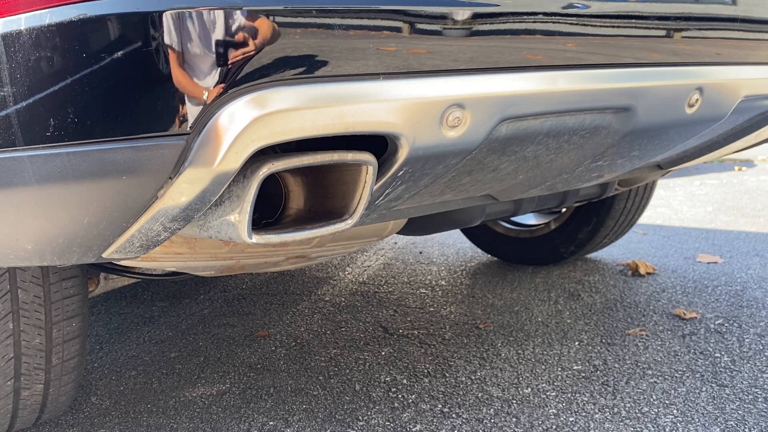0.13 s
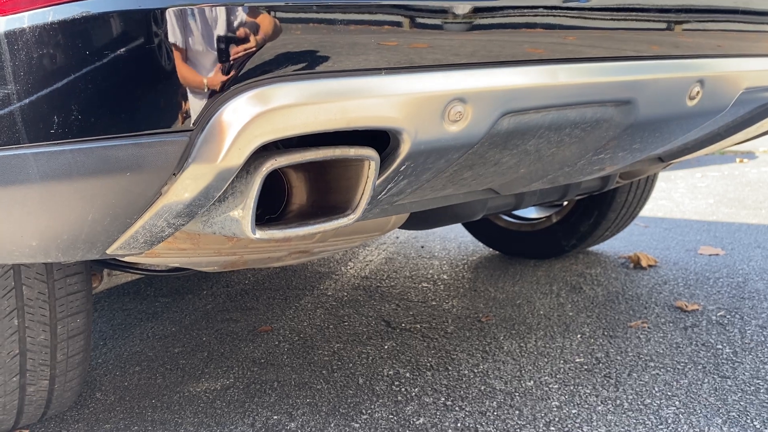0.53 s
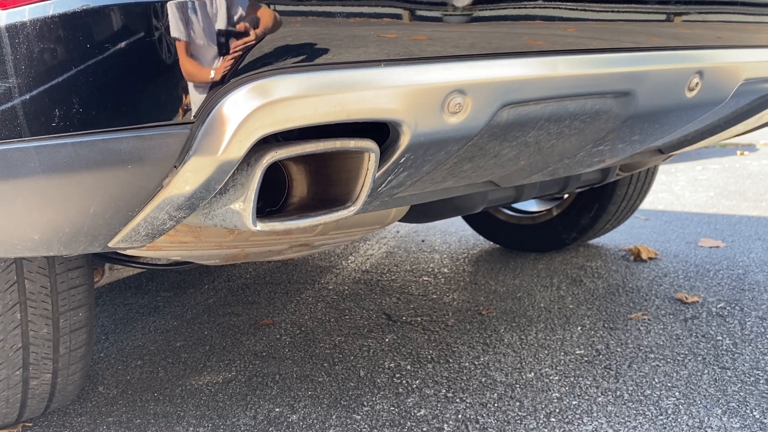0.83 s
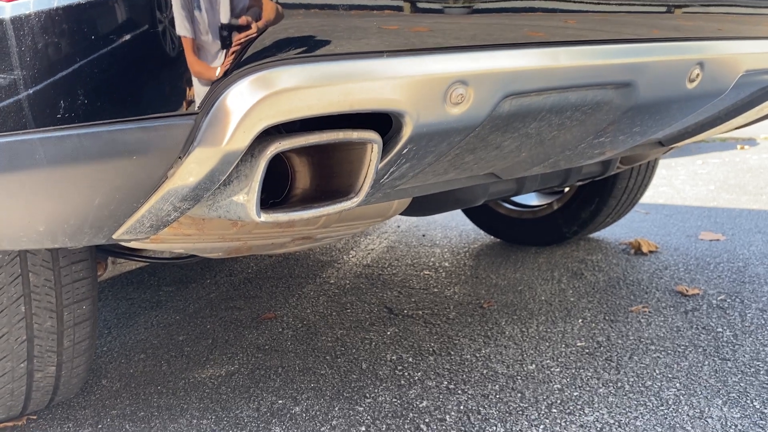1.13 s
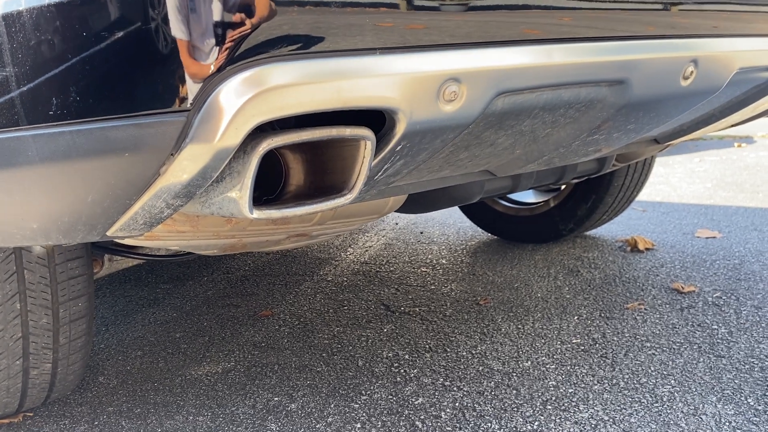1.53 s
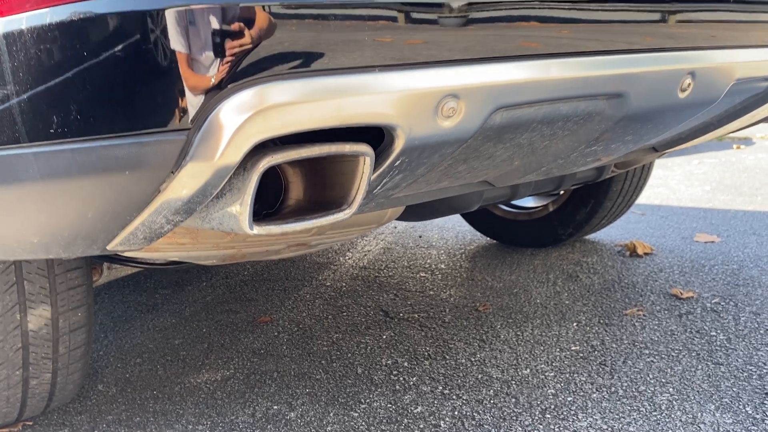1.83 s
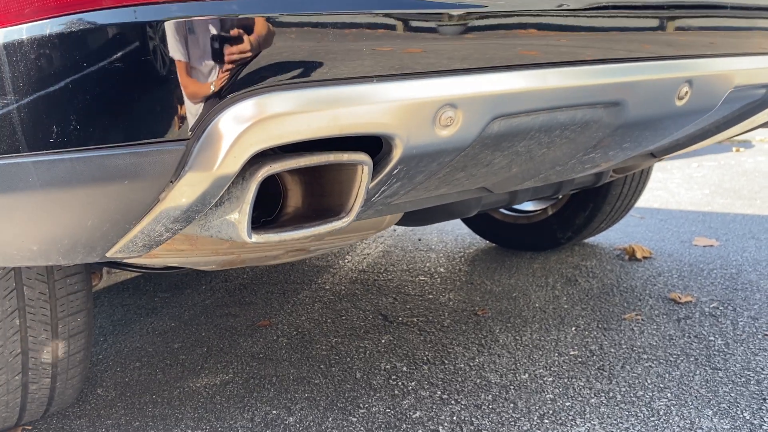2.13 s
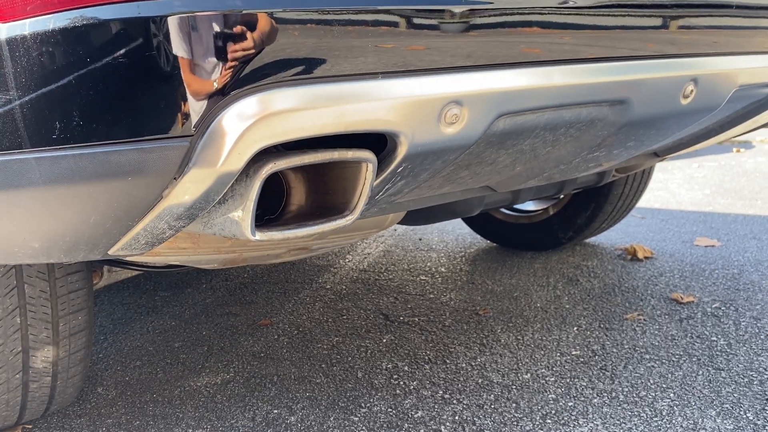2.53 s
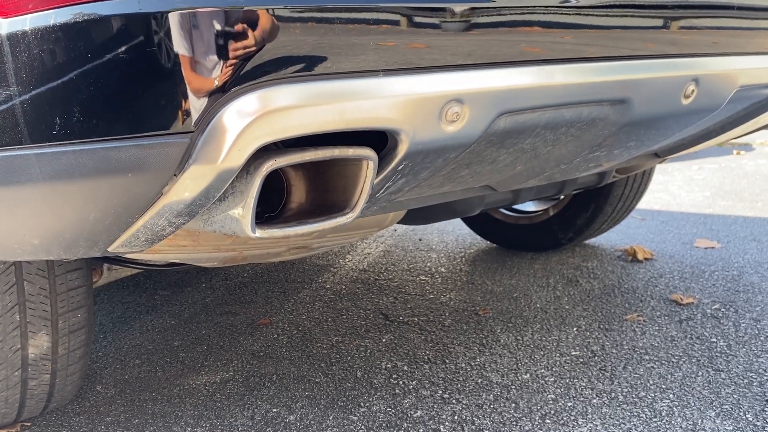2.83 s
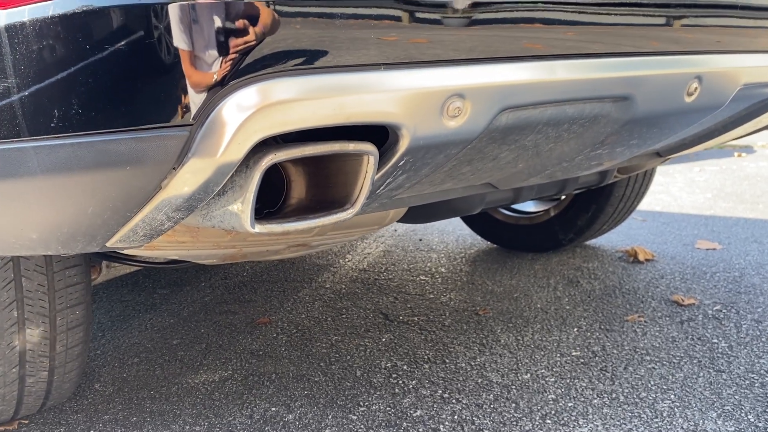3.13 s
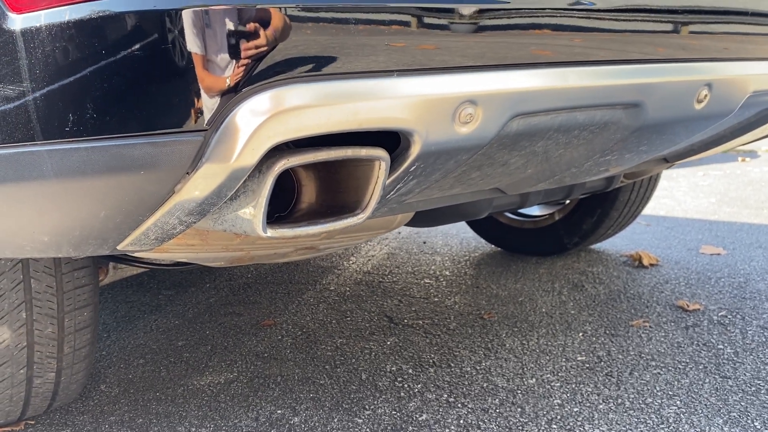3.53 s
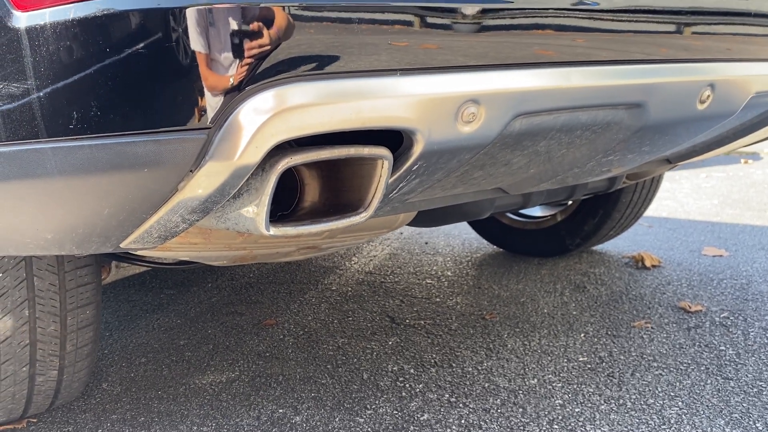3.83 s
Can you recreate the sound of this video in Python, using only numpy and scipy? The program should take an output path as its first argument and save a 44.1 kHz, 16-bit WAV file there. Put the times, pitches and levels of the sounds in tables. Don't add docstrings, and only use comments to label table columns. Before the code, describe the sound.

A parked car's exhaust idles steadily, deep and throbbing, with faint traffic far behind it.

```python
import sys
import numpy as np
from scipy import signal
from scipy.fft import rfft, irfft, next_fast_len
from scipy.io import wavfile
from scipy.ndimage import uniform_filter1d

SR = 44100
rng = np.random.default_rng(int(sys.argv[2]) if len(sys.argv) > 2 else 0)


def gain_from_db(level_db):
    decades = np.asarray(level_db, float) / 20
    return 10 ** decades


def dump(signal):
    limited = np.clip(np.atleast_2d(signal).T, -1, 1)
    pcm = np.round(limited * 32767).astype(np.int16)
    wavfile.write(sys.argv[1], SR, pcm)


N = 175518
TIME_S = np.arange(N) / SR

# (time [s], firing rate [Hz], level [dB])
IDLE = [(0.0, 56.1, -18), (0.17, 55.07, -16), (0.45, 54.44, -17.5), (0.73, 55.72, -16.5),
        (1.01, 54.38, -17), (1.29, 54.67, -16), (1.57, 55.28, -17), (1.85, 55.63, -15.5), (2.13, 55.6, -16),
        (2.41, 55.76, -16.5), (2.69, 54.9, -16.5), (2.97, 54.6, -17), (3.25, 54.14, -16),
        (3.53, 53.58, -17.5), (3.81, 53.4, -17.5), (3.98, 53.64, -17.5)]
# (frequency [Hz], level [dB])
HISS_SPECTRUM = [(600, -5.5), (1200, -9.5), (2300, -14), (3500, -19), (4700, -20), (7500, -23),
                 (11000, -23.5), (15500, -44)]
# (frequency [Hz], coherence [0-1])
PORT_COHERENCE = [(60, 1), (300, .9), (800, .45), (1600, .4), (2300, .65), (4300, .8), (5400, .3),
                  (7000, .985)]
# (frequency [Hz], phase lag [rad])
PORT_LAG = [(0, 0), (700, 1.1), (1400, 3.2), (2900, 7.6), (3700, 6), (7050, 6.3), (8950, 3.14),
            (15500, -6.4)]
# (frequency [Hz], level [dB])
PORT_BALANCE = [(380, -1), (700, 6), (1150, -.5), (2200, 0), (3000, 4.5), (4400, 1), (5700, 6.5), (7000, 0)]


def evened(x):
    return x / np.sqrt(np.mean(abs(x) ** 2) + 1e-20)


def read(points, hz):
    f, value = np.transpose(points)
    return np.interp(np.log(hz + 1), np.log(f + 1), value)


def curve(table, column, t):
    return np.interp(t, [row[0] for row in table], [row[column] for row in table])


def wander(hz):
    size = next_fast_len(N, True)
    spectrum = rfft(rng.standard_normal(N), size)
    spectrum = spectrum / (1 + (np.fft.rfftfreq(size, 1 / SR) / hz) ** 4)
    return evened(irfft(spectrum, size)[:N])


def sides(z, pan_db, lag_rad):
    left = z * gain_from_db(pan_db / 2)
    right = z * gain_from_db(-pan_db / 2) * np.exp(-1j * lag_rad)
    return np.array([left.real, right.real])


def port_lag_rad(hz):
    return np.interp(hz, *np.transpose(PORT_LAG))


def port_coherence(hz):
    return np.clip(read(PORT_COHERENCE, hz), 0, 1)


def pulse(t, rise_s):
    return (t / rise_s) ** 2 * np.exp(2 - 2 * t / rise_s)


def noise(shape_db, patchy_db, flicker_db):
    frames, hz = N // 128 + 5, np.fft.rfftfreq(512, 1 / SR)
    a, b, c, d, p = rng.standard_normal((frames, 257, 5)).T
    patches = uniform_filter1d(uniform_filter1d(p, size=6, axis=0), size=16, axis=1)
    flicker = uniform_filter1d(uniform_filter1d(p[::-1], size=120, axis=0), size=2, axis=1)
    same = port_coherence(hz)[:, None]
    lag = np.exp(-1j * port_lag_rad(hz))[:, None]
    pan = gain_from_db(read(PORT_BALANCE, hz) / 2)[:, None]
    left, other = a + 1j * b, c + 1j * d
    right = same * left * lag + np.sqrt(1 - same ** 2) * other
    level_db = shape_db(hz[:, None], np.arange(frames) * 128 / SR)
    level_db = level_db + patchy_db * evened(patches) / (1 + hz[:, None] / 6000)
    level_db = level_db + flicker_db * evened(flicker)
    z = np.array([left * pan, right / pan]) * gain_from_db(level_db)
    return signal.istft(z, nperseg=512, noverlap=384)[1][:, :N]


def fuzzy_tone(hz, width_hz):
    r = np.exp(-1.5 * np.pi * width_hz / SR)
    drive = rng.standard_normal(N) + 1j * rng.standard_normal(N)
    z = signal.lfilter([1], [1, -2 * r, r * r], drive)
    return np.sqrt(2) * evened(z) * np.exp(2j * np.pi * hz * TIME_S)


def traffic():
    # (frequency [Hz], level [dB])
    tyre_spectrum = [(150, -36), (300, -3), (500, -9.5), (850, 0.5), (1500, -3), (2100, -11.5), (3000, -24),
                     (5000, -41.5)]
    # (time [s], level [dB], brightness [dB/octave])
    passing = [(0, -48.5, 7), (.55, -40.5, -3), (.9, -44.5, 0.5), (1.3, -39.5, 2.5), (1.48, -37.5, 0.5),
               (1.62, -35.5, 2.5), (1.76, -33.5, 3), (1.88, -38, 0), (2.4, -38.5, -1.5), (2.9, -42, 2),
               (3.45, -39, -1), (3.75, -37.5, 0), (3.98, -33.5, -4)]

    def field_db(hz, t):
        return read(tyre_spectrum, hz) + curve(passing, 2, t) * np.log2((hz + 50) / 1200)

    x = evened(noise(field_db, patchy_db=1.6, flicker_db=-0.13))
    return gain_from_db(3.5 + curve(passing, 1, TIME_S)) * x


def hums():
    # (frequency [Hz], level [dB], share of approach [1], left-right [dB], right lag [rad])
    hum_tones = [
        (150.2, -36.5, 0.062, -1, 0.1),
        (270.4, -41, 1, -1, 0.74),
        (256.6, -48, 0.88, -7, 0.49),
        (314, -48, 1.36, 7, 0.57),
    ]
    # (time [s], level [dB])
    approach = [(0, -5.5), (.7, -4.5), (1.2, -16), (1.7, 0), (2.4, 0.5), (2.8, 5), (3.2, 1.5), (3.5, 8),
                (3.7, 2), (3.98, 12)]
    waver_db, waver_rad = 2.6, 0.8
    out = np.zeros((2, N))
    for hz, db, share, pan_db, lag_rad in hum_tones:
        level_db = db + share * curve(approach, 1, TIME_S) + waver_db * wander(16.6)
        phase = 2 * np.pi * hz * TIME_S + waver_rad * wander(3.86)
        out += sides(np.sqrt(2) * gain_from_db(level_db) * np.exp(1j * phase), pan_db, lag_rad)
    late_s, length_s, late_hz, late_db = 3.8, 0.4, 405, -38
    swell = np.exp(-((TIME_S - late_s) / length_s) ** 2)
    return out + sides(gain_from_db(late_db) * swell * np.exp(2j * np.pi * late_hz * TIME_S), 3.0, 0.9)


def whines():
    # (frequency [Hz], width [Hz], level [dB], left-right [dB], right lag [rad])
    whine_tones = [(2640, 90, -62, 2, .5), (3284, 40, -68, 3, .3), (3890, 80, -67, 2, .3),
                   (4722, 120, -65, 2, .3), (5631, 25, -71, 6, 0), (5900, 50, -72, 6, 0),
                   (6999, 30, -71.5, 0, 0), (7140, 45, -70.5, 0, 0), (8190, 60, -69, 0, -1.6)]
    out = np.zeros((2, N))
    for hz, width_hz, db, pan_db, lag_rad in whine_tones:
        out += sides(fuzzy_tone(hz, width_hz) * gain_from_db(db), pan_db, lag_rad)
    return out


def rumble():
    # (frequency [Hz], level [dB])
    roar_spectrum = [(20, 4), (35, 6), (72, 3), (125, -2), (240, -11.5), (400, -16), (600, -18.5),
                     (1200, -43.5)]
    level_db, low_cut_hz = -29, 27
    hz = np.fft.rfftfreq(N, 1 / SR)
    left, other = rfft(rng.standard_normal((2, N)))
    same = port_coherence(hz)
    right = same * left * np.exp(-1j * port_lag_rad(hz)) + np.sqrt(1 - same ** 2) * other
    ratio = (hz / low_cut_hz) ** 4
    shape = gain_from_db(read(roar_spectrum, hz)) * ratio / (1 + ratio)
    x = evened(irfft(np.array([left, right]) * shape, N))
    return gain_from_db(level_db + 2.2 * wander(19.0)) * x


def firing():
    return 2 * np.pi * np.cumsum(curve(IDLE, 1, TIME_S)) / SR


def hiss(turn):
    # (frequency [Hz], depth [1])
    throb = [(2000, 0), (5000, 0.08), (11000, 0.12), (16000, .13)]

    def field_db(hz, t):
        return read(HISS_SPECTRUM, hz) - 30 * (hz < 400)

    x = evened(noise(field_db, patchy_db=2.0, flicker_db=1.4))
    top = irfft(rfft(x) * read(throb, np.fft.rfftfreq(N, 1 / SR)), N)
    beat = np.cos(turn + 1.0) + 0.5 * np.cos(turn / 3)
    return gain_from_db(-41) * (x + top * beat)


def flecks():
    level_db, flecks_per_s, rise_s, low_hz, high_hz = -53, 700, 0.012, 1000, 8200
    t, out = np.arange(3000) / SR, np.zeros((2, N + 3000))
    size = gain_from_db(2.2 * np.minimum(rng.exponential(size=N), 4))
    size = size * (rng.random(N) < flecks_per_s / SR) * np.exp(2j * np.pi * rng.random(N))
    pitches_hz = np.geomspace(low_hz, high_hz, 30) * (1 + 0.0242 * rng.standard_normal(30))
    which = rng.integers(0, len(pitches_hz), N)
    shape = pulse(t, rise_s)
    rings = [shape * np.exp(2j * np.pi * hz * t) * gain_from_db(read(HISS_SPECTRUM, hz)) for hz in pitches_hz]
    pans_db, lags_rad = read(PORT_BALANCE, pitches_hz), port_lag_rad(pitches_hz)
    for at in np.flatnonzero(size):
        k = which[at]
        out[:, at:at + len(t)] += sides(size[at] * rings[k], pans_db[k], lags_rad[k])
    return gain_from_db(level_db) * evened(out[:, :N])


def pipe():
    # (frequency [Hz], width [Hz], level [dB], left-right [dB], right lag [rad])
    resonances = [(139.7, 14.3, -41, 3, .2), (173.4, 10, -43.5, 2, 0.21), (199, 50, -38.5, -3.5, 0.39),
                  (310, 25, -40, -6, 1.15), (338, 14.3, -41, 1, 0.85), (437.7, 23, -46.5, 5.5, 2.18),
                  (689.4, 63, -46.5, 10.5, 1.4), (817, 150, -50, 1, 1.05)]
    # (time [s], level [dB])
    blowing = [(0, -32), (.8, -36), (1.2, -38), (1.5, -36.5), (2.6, -37.5), (3.2, -36.5), (3.7, -32),
               (3.98, -30.5)]
    blow_db = curve(blowing, 1, TIME_S)
    blow_db = 0.94 * (blow_db - blow_db.mean())
    out = np.zeros((2, N))
    for hz, width_hz, db, pan_db, lag_rad in resonances:
        level_db = db + blow_db * (240 < hz < 1000)
        out += sides(fuzzy_tone(hz, width_hz) * gain_from_db(level_db), pan_db, lag_rad)
    return out


def chuffs():
    # (time of peak [s], low ring [dB], upper ring [dB])
    hard_firings = [(0.146, -21, -25), (0.299, -21, -22), (0.474, -22, -21), (0.552, -20.5, -21),
                    (0.69, -22, -47), (0.798, -23, -32), (.964, -51, -41), (1.498, -17, -43),
                    (1.643, -25, -42), (1.89, -21, -21), (1.996, -14.5, -17), (2.104, -30, -24),
                    (2.314, -17.5, -22), (2.535, -20.5, -47), (2.751, -33, -19), (3.02, -24, -26),
                    (3.08, -20, -28), (3.204, -36, -30), (3.309, -17, -25), (3.415, -21, -28),
                    (3.534, -19, -35), (3.698, -17, -38), (3.754, -19.5, -38), (3.877, -19, -30)]
    low_hz, low_rise_s, low_db = 322, 0.011, -7.5
    high_hz, high_rise_s, high_db = 720, 0.006, -11
    out, t = np.zeros((2, N + 4000)), np.arange(4000) / SR
    for s, db, upper_db in hard_firings:
        u, v, w = rng.random(3)
        low = np.exp(2j * np.pi * (low_hz * (0.965 + 0.1 * u) * t + w))
        low = low * gain_from_db(db + low_db) * pulse(t, low_rise_s)
        high = np.exp(2j * np.pi * (high_hz * (0.847 + 0.31 * v) * t + u))
        high = high * gain_from_db(upper_db + high_db) * pulse(t, high_rise_s)
        at = round((s - low_rise_s) * SR)
        out[:, at:at + 4000] += sides(low, -0.65, 0.68) + sides(high, 5.1, 0.9)
    return out[:, :N]


def boom(turn):
    # (multiple of firing rate [1], level [dB], left-right [dB])
    tones = [
        (1, 0.5, -1.04),
        (2, -9.5, -4.5),
        (.5, -42, -6),
        (1.5, -47, -4),
        (2.5, -25, -6),
    ]
    # (time [s], dip [dB])
    stumbles = [
        (.63, -0.5),
        (.95, -1.5),
        (1.53, -2),
        (1.73, -2),
        (1.84, -3.5),
        (2.3, -3),
        (2.82, -1.5),
        (3.14, -3),
        (3.33, -7.5),
        (3.7, -2.5),
    ]
    cylinders, stumble_s = 6, 0.03
    lope_db, lope_rad, lope_drift, octave_lope_share = -0.16, 0.12, 0.5, 0.6
    uneven_db, uneven_hz, uneven_rad = 0.5, 13, 0.057
    flutter_db, sag_db_per_hz, drift_rad, octave_lead_rad = 0.8, 2.4, 0.05, -0.35
    cycle = np.exp(1j * turn / cylinders)
    lope = cycle * (1 + lope_drift * (wander(1.5) + 1j * wander(2.1)))
    turn = turn + uneven_rad * wander(5.8)
    level_db = curve(IDLE, 2, TIME_S) + lope_db * lope.real + uneven_db * wander(uneven_hz)
    for s, dip_db in stumbles:
        level_db = level_db + dip_db * np.exp(-((TIME_S - s) / stumble_s) ** 2)
    sag_db = sag_db_per_hz * np.minimum(curve(IDLE, 1, TIME_S) - 54.6, 0)
    out = np.zeros((2, N))
    for k, db, pan_db in tones:
        chance = wander(8.3)
        tone_db = level_db + db + flutter_db * (k != 1) * chance + sag_db * (k == 2)
        lope_share = 1 if k == 1 else k * octave_lope_share
        sway = lope_rad * lope.imag * lope_share + drift_rad * (k == 1) * chance
        phase = k * turn + sway + octave_lead_rad * (k - 1)
        out += sides(np.sqrt(2) * gain_from_db(tone_db) * np.exp(1j * phase), pan_db, 0.14 * (k - 1))
    return out


def scene():
    turn = firing()
    background = traffic() + hums() + whines()
    engine = rumble() + hiss(turn) + flecks()
    return background + engine + pipe() + chuffs() + boom(turn)


def band_limit(x):
    return signal.sosfilt(signal.butter(12, 16920, fs=SR, output="sos"), x)


def record(dry):
    # (low edge [Hz], high edge [Hz])
    mid_gaps = [(8780, 9220), (12960, 13760), (15700, 23000)]
    # (low edge [Hz], high edge [Hz])
    side_gaps = [(6950, 7450), (10950, 11650), (14800, 23000)]
    hz = np.fft.rfftfreq(N, 1 / SR)
    slope = np.linspace(dry[:, 0], dry[:, -1], N).T
    left, right = dry - slope
    mid = rfft(left + 0.98 * right) / 2
    side = rfft(left - 0.88 * right) / 2
    for low_hz, high_hz in mid_gaps:
        mid = mid * ((hz < low_hz) | (hz > high_hz))
    for low_hz, high_hz in side_gaps:
        side = side * ((hz < low_hz) | (hz > high_hz))
    mix = slope + irfft(np.array([mid + side, mid - side]), N)
    return band_limit(mix)


dry = scene()
out = record(dry)
dump(out)
```